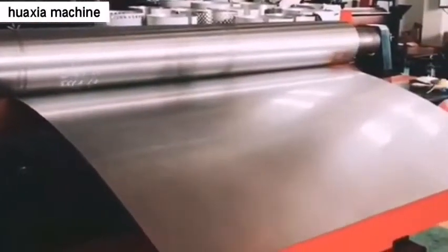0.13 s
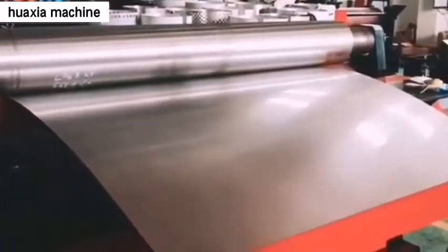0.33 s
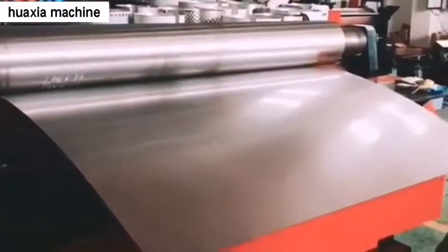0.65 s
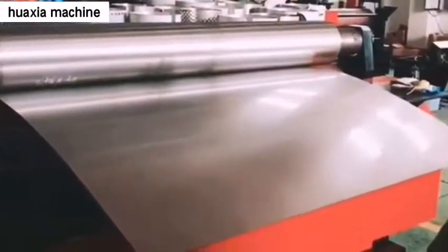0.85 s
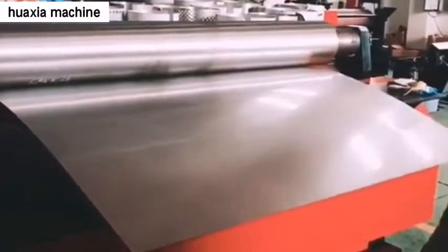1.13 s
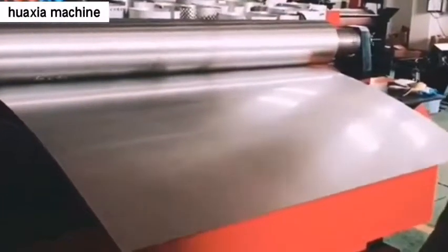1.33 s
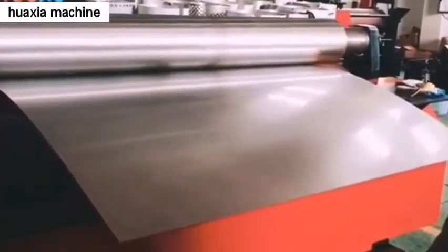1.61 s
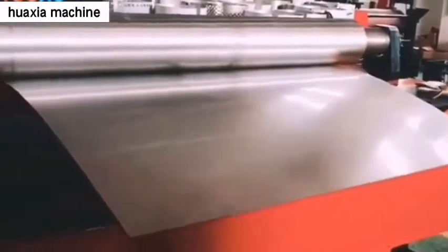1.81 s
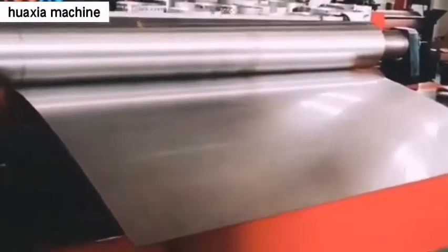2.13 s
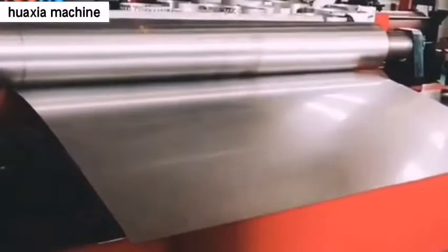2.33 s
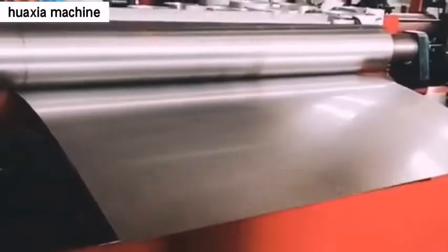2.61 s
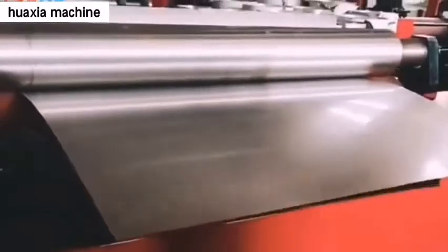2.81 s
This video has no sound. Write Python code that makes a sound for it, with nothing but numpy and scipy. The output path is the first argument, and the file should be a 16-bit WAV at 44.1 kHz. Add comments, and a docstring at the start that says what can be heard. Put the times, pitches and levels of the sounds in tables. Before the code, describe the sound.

A plate rolling machine hums and booms steadily while its steel sheet ticks and clacks

```python
"""A booming hum is heard first, with a thin whine, over a wide wash of workshop noise: a plate rolling machine.
Motor vibration excites resonances of its frame and cabinet as narrow-band noise; the pump is a harmonic series.
The steel sheet then ticks, scuffs and clacks as it slips over the rolls. Each tick is a crack of noise, a
dispersed rattle and a ringing of plate modes; scuffs and sliding hiss are lumpy noise under slow envelopes."""
import sys
import numpy as np
from scipy import signal
from scipy.fft import rfft, irfft
from scipy.io import wavfile
from scipy.ndimage import uniform_filter1d

SR = 44100
rng = np.random.default_rng(int(sys.argv[2]) if len(sys.argv) > 2 else 0)


def output_pcm(signal):
    """Save a mono or channel-first signal as 16-bit PCM at the path in sys.argv[1].

    Samples are clipped to [-1, 1] before scaling.
    """
    pcm = np.clip(np.atleast_2d(signal).T, -1, 1) * 32767
    wavfile.write(sys.argv[1], SR, np.round(pcm).astype(np.int16))


def to_linear_factor(level_db):
    """Convert decibel levels (scalar or array-like) to linear amplitude factors."""
    exponent = np.asarray(level_db, float) / 20
    return 10 ** exponent


N = 130536  # length in samples


def evened(x):
    """Normalization: scales a signal to unit rms."""
    return x / np.sqrt(np.mean(x ** 2) + 1e-20)


def read(points, hz):
    """Spectral envelope: interpolates its points along a logarithmic frequency axis."""
    f, value = np.transpose(points)
    return np.interp(np.log(hz + 1), np.log(f + 1), value)


def curve(points, column=1):
    """Temporal envelope: interpolates one column of a table linearly over time."""
    rows = np.transpose(points)
    return np.interp(np.arange(N) / SR, rows[0], rows[column])


def add(mix, s, sound):
    """Superposition: adds a sound to the mix from time s on."""
    part = mix[max(round(s * SR), 0):][:len(sound)]
    part += sound[:len(part)]


def slow(top_hz):
    """Low-pass random modulation of unit rms, 6 dB down at top_hz."""
    spectrum = rfft(rng.standard_normal(N))
    hz = np.fft.rfftfreq(N, 1 / SR)
    return evened(irfft(spectrum / (1 + (hz / top_hz) ** 4), N))


def coloured(points, x):
    """Linear filtering: shapes a spectrum by its envelope, then sets unit rms."""
    hz = np.fft.rfftfreq(N, 1 / SR)
    return evened(irfft(rfft(x) * to_linear_factor(read(points, hz)), N))


# spectral density of the shop noise: pitch_hz [Hz], level_db [dB per Hz, relative]
WASH_COLOUR = [(13, -73.5), (22, -23.5), (141, -11.5), (197, -10.5), (357, -6), (500, -13.5), (904, -18.5),
               (1000, -20), (2070, -25), (2740, -32), (3040, -28), (3740, -39.5), (8320, -54),
               (9470, -52.5), (10500, -99), (13600, -129), (22000, -120)]
# swell of the shop noise, used about its mean: start_s [s], level_db [dB]
WASH_SWELL = [(0.0, -37.5), (1.23, -37), (1.41, -38), (1.85, -36), (2.18, -41), (2.42, -38), (2.96, -37)]


def wash():
    """Diffuse broadband noise: random time-frequency cells with drifting patches and a quick treble flicker."""
    frames, hz = N // 128 + 5, np.fft.rfftfreq(512, 1 / SR)
    real, imaginary, patches = rng.standard_normal((3, len(hz), frames))
    patches = uniform_filter1d(patches, size=8, axis=0)
    patches = evened(uniform_filter1d(patches, size=12, axis=1))
    at = np.minimum(np.arange(frames) * 128, N - 1)
    treble = np.clip(hz / 4000, 0, 1)[:, None]
    patch_db = 1.82 * (1 + treble) * patches
    swell_db = 0.6 * slow(8.2)[at]
    flicker_db = 2.5 * treble * slow(23)[at]
    cells = (real + 1j * imaginary) * to_linear_factor(patch_db + swell_db + flicker_db)
    noise = signal.istft(cells, nperseg=512, noverlap=384)[1][:N]
    level = curve(WASH_SWELL)
    return to_linear_factor(-33 + level - level.mean()) * coloured(WASH_COLOUR, noise)


def ringing(hz, width):
    """Resonant response to random force: band noise with a quarter of its envelope swell (in dB) evened out."""
    spectrum = rfft(rng.standard_normal(N))
    detuning = 2 * (np.fft.rfftfreq(N, 1 / SR) - hz) / width
    z = signal.hilbert(irfft(spectrum / (1 + detuning ** 2), N))
    return evened(z.real / abs(z) ** 0.25)


# frame and cabinet resonances: pitch_hz [Hz], width_hz [Hz, 6 dB down, before evening],
# level_db [dB rms, before the swells below]
RESONANCES = [(110.8, 15, -51.5), (154.6, 13, -40.5), (247.7, 6.3, -40), (278.7, 21, -41),
              (302.3, 12, -41.5), (316, 19, -39.5), (340, 9.6, -33.5), (356.6, 16, -35), (370.9, 14, -35.5),
              (390.3, 22, -42), (580.3, 25, -47.5), (638, 41, -48), (680, 14, -54), (927.4, 25, -50.5)]
# vibration, used about its mean: start_s [s], cabinet level_db [dB], main frame level_db [dB]
FRAME_SWELL = [(0.0, -42.5, -27.5), (0.19, -41, -34), (0.25, -32, -32), (0.28, -47, -26),
               (0.55, -35.5, -36), (0.62, -54, -31), (0.81, -37.5, -31.5), (0.95, -48, -23),
               (1.15, -45, -33.5), (1.57, -36, -29.5), (1.62, -37, -24.5), (1.77, -38, -33.5),
               (1.81, -39, -24), (1.94, -33.5, -33.5), (2.01, -50, -26.5), (2.14, -34, -35),
               (2.18, -37, -25), (2.22, -36, -41), (2.24, -45, -26), (2.32, -33.5, -27),
               (2.4, -41.5, -26.5), (2.6, -33, -32.5), (2.63, -36, -44.5), (2.65, -48, -31),
               (2.71, -35, -30.5), (2.8, -36, -35.5), (2.87, -26, -34.5), (2.96, -50, -31.5)]
# vibration, used about its mean: start_s [s], low panel level_db [dB], upper panel level_db [dB]
PANEL_SWELL = [(0.0, -42.5, -54), (0.1, -51.5, -47.5), (0.48, -32.5, -44), (0.7, -38, -46),
               (0.82, -37.5, -40.5), (1.17, -42, -34.5), (1.22, -29, -42.5), (1.8, -41.5, -38.5),
               (1.95, -29, -43), (2.02, -42.5, -42), (2.18, -27, -35), (2.27, -39.5, -50.5),
               (2.39, -36, -28.5), (2.49, -42.5, -35), (2.68, -29.5, -36.5), (2.82, -43.5, -50),
               (2.86, -33, -36.5), (2.96, -41.5, -37)]


def frame():
    """Modal superposition: motor vibration rings each resonance; cabinet, frame and panels swell on their own."""
    levels = [curve(table, column) for table in (FRAME_SWELL, PANEL_SWELL) for column in (1, 2)]
    cabinet, main, low, upper = [to_linear_factor(level - level.mean()) for level in levels]
    out = np.zeros(N)
    for hz, width, db in RESONANCES:
        swell = 1  # resonances outside the four bands hold their level
        if hz < 200:
            swell = cabinet
        elif hz < 260:
            swell = low
        elif 330 < hz < 420:
            swell = main
        elif 540 < hz < 720:
            swell = upper
        out += to_linear_factor(db) * ringing(hz, width) * swell
    return out


# pump harmonics: multiple [of the fundamental], level_db [dB rms, before waver and load], waver_db [dB rms]
PUMP_HARMONICS = [(1, -48.5, 7), (3, -45.5, 4), (6, -52.5, 0.5), (8, -63.5, 6.5), (10, -61, 6),
                  (14, -62.5, 2)]
# load on the tenth harmonic: start_s [s], level_db [dB, added]
TENTH_LOAD = [(0, 3), (1.2, -8.5), (2.2, -1), (2.45, 7), (2.96, 10)]


def pump():
    """Harmonic series of a rotating source: partials follow one shared pitch from random starting phases and
    waver in level; the tenth follows load."""
    fundamental_hz, wander = 149.6, 0.0006  # wander: rms share of the pitch
    turns = np.cumsum(fundamental_hz * (1 + wander * slow(1.57))) / SR
    load = curve(TENTH_LOAD)
    out = np.zeros(N)
    for multiple, db, waver_db in PUMP_HARMONICS:
        level = db + waver_db * slow(2.9) + load * (multiple == 10)
        cycles = multiple * turns + rng.random()
        out += np.sqrt(2) * to_linear_factor(level) * np.sin(2 * np.pi * cycles)
    return out


def gritty():
    """Nonstationary friction noise: lumpy in level, its colour shifting from moment to moment."""
    z = signal.stft(rng.standard_normal(N) * to_linear_factor(1.5 * slow(550)), nperseg=256)[2]
    mottle = uniform_filter1d(rng.standard_normal(z.shape), size=8, axis=0)
    mottle = evened(uniform_filter1d(mottle, size=4, axis=1))
    return signal.istft(z * to_linear_factor(3 * mottle), nperseg=256)[1][:N]


# hiss of the sliding sheet: start_s [s], level_db [dB rms]
SLIDING_HISS = [(0, -62), (.8, -76), (1.1, -68), (1.5, -64), (1.75, -58.5), (2.05, -55.5), (2.3, -70),
                (2.5, -55.5), (2.7, -54), (2.96, -57.5)]
# soft swells of grit: centre_s [s], length_s [s, half the window], level_db [dB rms at the crest]
SHEET_SCUFFS = [(0.114, 0.045, -49), (0.239, 0.068, -51), (0.388, 0.041, -44), (0.452, 0.083, -47),
                (0.51, 0.027, -62), (0.676, 0.1, -53.5), (0.738, 0.037, -46), (1.239, 0.13, -53),
                (1.427, 0.062, -54), (1.67, 0.064, -57), (1.78, 0.033, -47), (1.807, 0.034, -46),
                (1.926, 0.031, -63), (2.208, 0.11, -69), (2.344, 0.047, -58), (2.408, 0.053, -52.5),
                (2.536, 0.041, -54)]
# spectral density of the grit: pitch_hz [Hz], level_db [dB per Hz, relative]
GRIT_COLOUR = [(2060, -29), (3500, -0.5), (6080, -2), (7300, -5), (9060, -3.5), (9890, -4.5),
               (10500, -79.5), (13600, -105), (22000, -120)]


def sliding(grit):
    """Sliding friction: a hiss of changing level, with scuffs as smooth amplitude swells."""
    envelope = to_linear_factor(curve(SLIDING_HISS))
    for centre, length, db in SHEET_SCUFFS:
        add(envelope, centre - length, to_linear_factor(db) * np.hanning(round(2 * length * SR)) ** 2)
    return envelope * coloured(GRIT_COLOUR, grit)


# ticks and clacks: start_s [s], level_db [dB, nominal], t60_s [s, rattle, at least 0.01],
# ring_db [dB re level, drive of the plate modes], snap_db [dB re level, crack before its halving]
SHEET_TICKS = [(0.38, -28.5, 0.088, -15, -5), (0.466, -27.5, 0.1, -8, 5.5), (0.6427, -31, 0.047, -8, 6),
               (0.654, -37.5, 0.054, -1, 8), (1.196, -35.5, 0.045, -8, 7), (1.214, -38, 0.047, -4, 9),
               (1.611, -34.5, 0.03, -9, 0), (1.6203, -30, 0.039, -11, 7.5),
               (1.7924, -27, 0.013, -11.5, 7.5), (1.7962, -21.5, 0.027, -11, -1),
               (1.8868, -28.5, 0.037, -9, 2), (1.89, -23.5, 0.091, -16, -5), (1.917, -28.5, 0.079, -7, -3),
               (2.1608, -13, 0.03, -14.5, 3.5), (2.1648, -21.5, 0.043, -5, 1.5), (2.17, -30, 0.046, -7, -3),
               (2.177, -27, 0.15, 0.5, -3), (2.189, -23, 0.15, -9, -3), (2.194, -28.5, 0.13, -12, -4),
               (2.2328, -21, 0.088, -16, -2), (2.239, -34, 0.052, -17, 1), (2.2573, -27, 0.11, -24, -1),
               (2.3551, -18.5, 0.012, -30, 9.5), (2.3578, -11, 0.024, -18, -0.5),
               (2.3606, -20, 0.014, -13, 3.5), (2.367, -34, 0.03, -2.5, -9)]


def tick_envelopes():
    """Impact excitation: each contact gives a brief crack, a longer rattle and a blow to the plate."""
    snaps, rattles, blows = np.zeros((3, N))
    t = np.arange(0, 0.4, 1 / SR)
    rise = np.minimum(t / 0.00055, 1) ** 2
    early = t[:400]
    snap = np.minimum(early / 0.00014, 1) * np.exp(-early / 0.0007) / 2
    for s, db, t60, ring_db, snap_db in SHEET_TICKS:
        add(snaps, s, to_linear_factor(db + snap_db) * snap)
        add(rattles, s, to_linear_factor(db - 13.5) * rise * to_linear_factor(-60 * t / max(t60, 0.01)))
        add(blows, s, to_linear_factor(db + ring_db) * rise * np.exp(-t / 0.0024))
    return snaps, rattles, blows


# spectral density of the crack: pitch_hz [Hz], level_db [dB per Hz, relative]
CRACK_COLOUR = [(2000, -31), (3600, -8), (5000, -2.5), (6800, 0), (8600, 0), (9900, -8), (11000, -40),
                (22000, -100)]


def crack(snaps):
    """Short contact time: an abrupt impact radiates a burst of high-frequency noise."""
    return snaps * coloured(CRACK_COLOUR, rng.standard_normal(N))


def dispersed(x):
    """Bending-wave dispersion: delay falls as one over the root of frequency, so low waves arrive later."""
    hz = np.clip(np.fft.rfftfreq(N, 1 / SR), 800, 6000)
    delay_s = 0.008 * (np.sqrt(2000 / hz) - np.sqrt(1 / 3))  # zero from 6 kHz up
    cycles = np.cumsum(delay_s) * SR / N  # phase is the integral of group delay
    return irfft(rfft(x) * np.exp(-2j * np.pi * cycles), N)


# spectral density of the rattle: pitch_hz [Hz], level_db [dB per Hz, relative]
RATTLE_COLOUR = [(710, -7.5), (1200, -3), (1840, -8.5), (3230, -9), (3730, -18), (4560, -24), (5080, -9),
                 (5610, -9), (8920, -12), (10500, -17.5), (13600, -69), (22000, -120)]


def rattle(rattles, grit):
    """Repeated contact: bright, exponentially dying grit spreads through the plate as bending waves."""
    return dispersed(rattles * coloured(RATTLE_COLOUR, grit))


# plate modes: pitch_hz [Hz], level_db [dB, relative], t60_s [s]
PLATE_MODES = [(1118, -13.5, 0.19), (1297, -17.5, 0.31), (1720, -6.5, 0.042), (1893, -7, 0.044),
               (2150, -15.5, 0.024), (2242, -5.5, 0.039), (2820, -11.5, 0.018), (3175, -11.5, 0.038),
               (3480, -9, 0.037), (4286, -12, 0.049), (4577, -7, 0.018), (5700, -12, 0.04),
               (6250, -12.5, 0.021), (6700, -15, 0.044), (8270, -17, 0.019)]


def plate_modes(blows):
    """Modal impulse response: chattering blows are convolved with delayed, decaying sines."""
    t = np.arange(0, 0.4, 1 / SR)
    out = np.zeros(N)
    for hz, db, t60 in PLATE_MODES:
        delay_s = 0.012 * (np.sqrt(2000 / hz) - 0.5)  # zero at 8 kHz
        late = np.maximum(t - delay_s, 0)
        mode = to_linear_factor(db - 60 * late / t60) * np.sin(2 * np.pi * hz * late)
        chatter = rng.standard_normal(N) * (rng.random(N) < 0.15)
        out += signal.oaconvolve(blows * chatter, mode)[:N] / 2
    return out


def sheet():
    """Superposition of impact and friction: cracks, rattle and plate modes with sliding grit."""
    snaps, rattles, blows = tick_envelopes()
    grit = gritty()
    impacts = crack(snaps) + rattle(rattles, grit) + plate_modes(blows)
    return impacts + sliding(grit[::-1])  # reversed, so that it does not follow the rattle


def scene():
    """Linear superposition of all sources, equal in both channels."""
    mono = wash() + frame() + pump() + sheet()
    return np.array([mono, mono])


def treble_side(mono):
    """Interchannel decorrelation: random side signal in passing treble patches, left out where power jumps."""
    hz, _, z = signal.stft(mono, SR, nperseg=1024)
    real, imaginary, blocks = rng.standard_normal((3, *z.shape))
    blocks = uniform_filter1d(blocks, size=70, axis=0)
    blocks = evened(uniform_filter1d(blocks, size=4, axis=1))
    blocks = blocks[::24].repeat(24, axis=0)[:len(hz)]
    from_hz = 4300
    octaves = np.log2(hz[:, None] / from_hz + 1e-9)
    on = (blocks < -0.92 + 0.7 * octaves) & (hz[:, None] > from_hz)
    power = uniform_filter1d(abs(z) ** 2, size=9, axis=0)
    calm = power < uniform_filter1d(power, size=15, axis=1) * 10 ** (4.25 / 10)  # 4.25 dB over local mean
    side = np.sqrt(power / 2) * (real + 1j * imaginary) * (on & calm) * to_linear_factor(3)
    return signal.istft(side, SR, nperseg=1024)[1][:N]


def band_limit(x):
    """Low-pass filtering: a steep edge at 9660 Hz above which a skirt 21 dB down reaches 10600 Hz."""
    skirt, window = to_linear_factor(-21), ("kaiser", 6.5)
    edge = (1 - skirt) * signal.firwin(601, 9660, fs=SR, window=window)
    edge[250:351] += skirt * signal.firwin(101, 10600, fs=SR, window=window)
    return signal.oaconvolve(x, edge[None], "same")


def top_cut(x):
    """Nothing passes above the cut-off."""
    return signal.sosfilt(signal.butter(12, 10950, fs=SR, output="sos"), x)


def record(dry):
    """Both channels carry the same sound, except in passing treble patches where noise of opposite sign is
    added left and right; then band limited."""
    side = treble_side(dry[0])
    mix = band_limit(dry + np.array([side, -side]))
    return top_cut(mix)


dry = scene()
out = record(dry)
output_pcm(out)
```